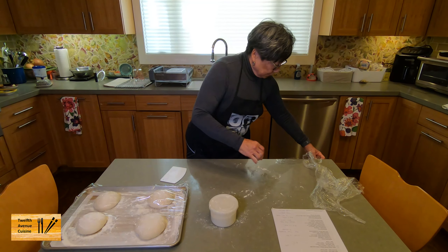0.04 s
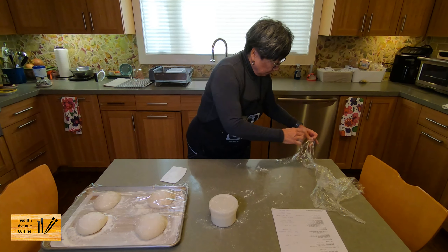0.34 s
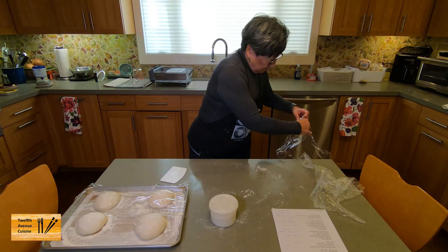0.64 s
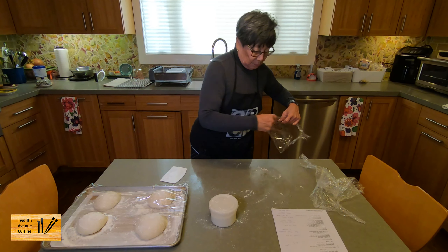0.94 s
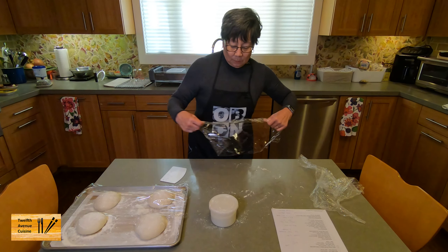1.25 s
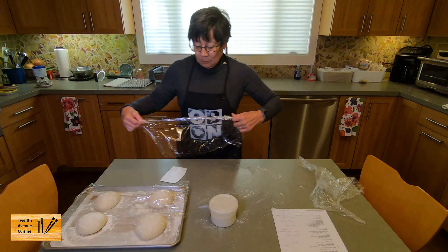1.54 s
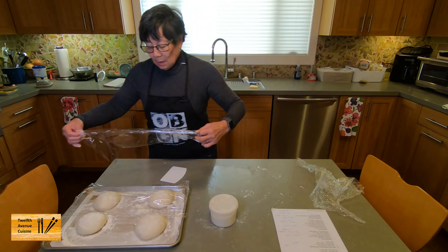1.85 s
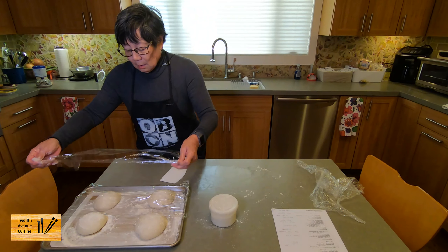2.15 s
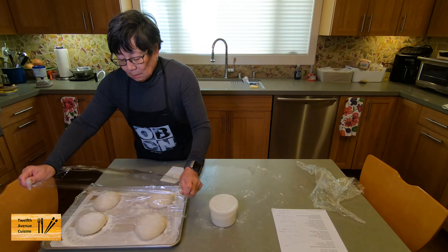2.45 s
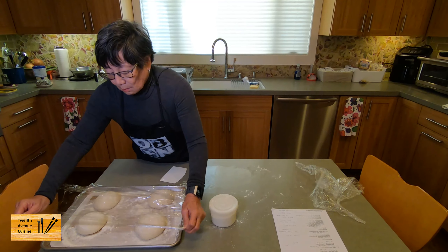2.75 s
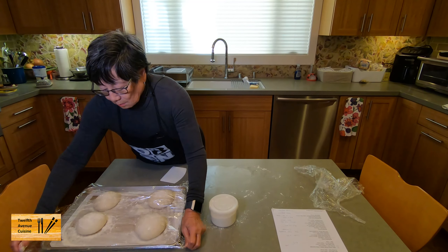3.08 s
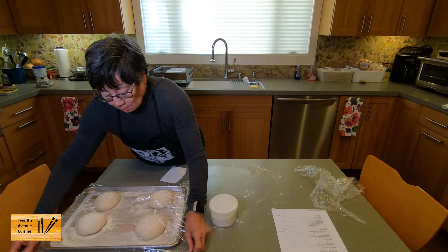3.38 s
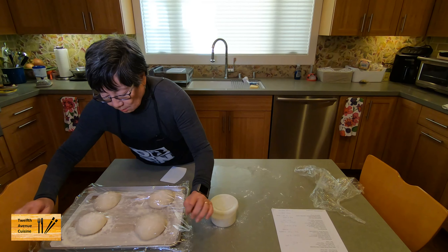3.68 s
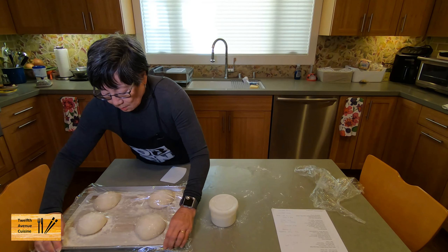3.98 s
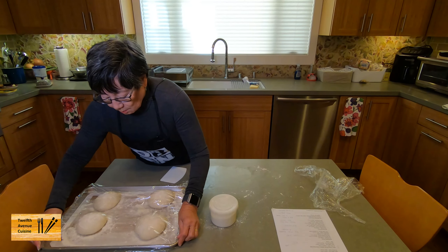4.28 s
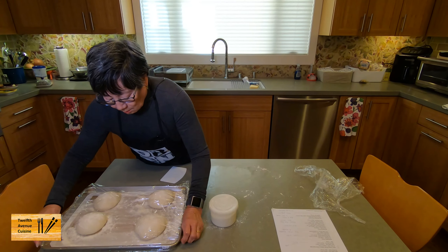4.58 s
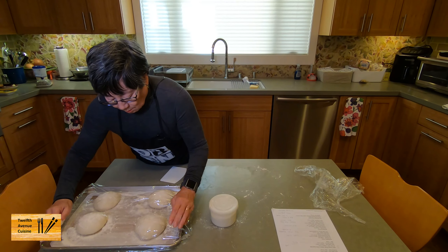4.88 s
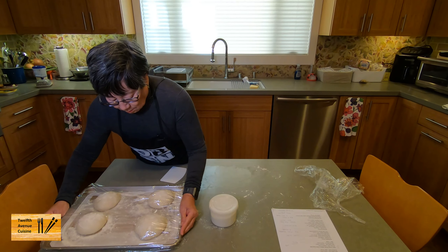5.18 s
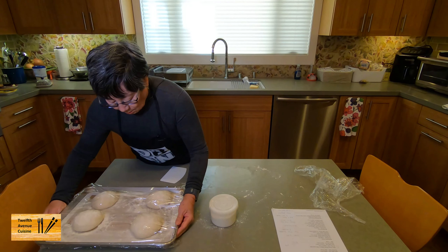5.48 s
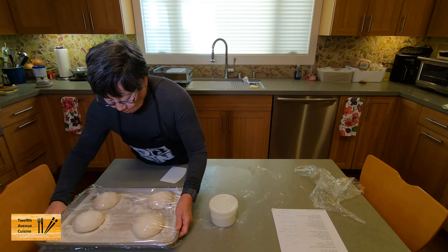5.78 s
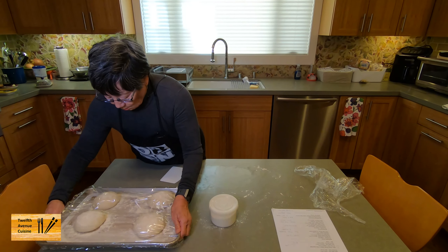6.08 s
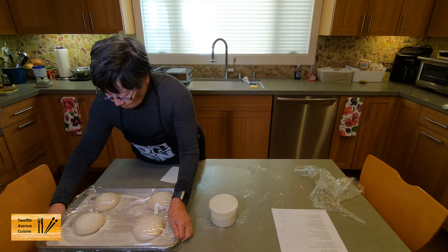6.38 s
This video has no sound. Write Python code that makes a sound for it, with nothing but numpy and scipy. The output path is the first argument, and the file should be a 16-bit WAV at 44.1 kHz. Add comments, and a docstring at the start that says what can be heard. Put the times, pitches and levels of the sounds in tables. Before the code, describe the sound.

Thin plastic wrap crinkles from the start, a fine, bright crackle that comes in uneven swells and is fullest around 1 second. From about 1.7 to 2.4 seconds the film is pulled taut and gives a faint, wavering rasp among the rustling. Sharp little snaps come mostly between 1.4 and 3.4 seconds, the strongest near 2.5, 2.7 and 3.3. After a short lull, lighter strokes of rustling return from 4 seconds to the end as the film is tucked around a metal tray. The tray knocks on the stone counter at about 5.7 seconds, twice more firmly around 6.2 to 6.3, then lightly near 6.6, each a clack with a short, damped ring. Underneath, a fridge hums low and steady, and the cook's movements add dull rubbing and soft thuds near 1.6, 5.4 and 6.6 seconds. The kitchen is slightly reverberant, heard in stereo from across the counter.

```python
"""Cling wrap on a baking tray

Film is peeled open, stretched and tucked round a metal tray in a tiled kitchen. It rustles with
countless tiny buckles and a few sharp snaps; at the end the tray knocks on the stone counter.
A fridge hums and the cook moves about. A camera with two close microphones stands across the counter."""
import sys
import numpy as np
from scipy import signal
from scipy.fft import rfft, irfft, next_fast_len
from scipy.io import wavfile

SR = 44100
rng = np.random.default_rng(int(sys.argv[2]) if len(sys.argv) > 2 else 0)


def digitize_waveform(pressure):
    """Quantize a signal to 16-bit integers and store it at the path in sys.argv[1].

    Rows of a 2-D input are taken as channels; values are limited to [-1, 1].
    """
    field = np.atleast_2d(pressure).T
    bounded = np.clip(field, -1, 1)
    quanta = np.round(bounded * 32767).astype(np.int16)
    wavfile.write(sys.argv[1], SR, quanta)


N = 292471
T = np.arange(N) / SR
CONTROL_T = T[::32]


def undb(db):
    """Decibels to gain."""
    return 10 ** (np.asarray(db) / 20)


def unit_rms(x):
    """Scale to rms 1."""
    return x / np.sqrt(np.mean(x ** 2))


def curves(table):
    """Interpolate (time, values...) rows to one curve per value column."""
    times_s, *columns = np.transpose(table)
    return [np.interp(T, times_s, column) for column in columns]


def at_hz(points, hz):
    """Read (frequency, value) points on a log-frequency axis."""
    points_hz, values = np.transpose(points)
    return np.interp(np.log(np.maximum(hz, 1)), np.log(points_hz), values)


def colour(x, eq, size=8192):
    """Minimum-phase filter through (frequency [Hz], gain [dB]) points."""
    gain = undb(at_hz(eq, np.fft.rfftfreq(size, 1 / SR)))
    cepstrum = irfft(np.log(gain))
    cepstrum[1:size // 2] *= 2
    cepstrum[size // 2 + 1:] = 0
    response = irfft(np.exp(rfft(cepstrum)))
    return np.apply_along_axis(signal.oaconvolve, -1, x, response)[..., :x.shape[-1]]


def decay(t, t60_s):
    """Exponential decay, 60 dB down at t60_s."""
    return np.exp(-np.log(1000) * t / t60_s)


def wander(rate_hz):
    """Random curve with a spread near 1."""
    knots_s = np.arange(0, T[-1] + 2 / rate_hz, 1 / rate_hz)
    return np.interp(T, knots_s, rng.standard_normal(len(knots_s)))


def add(track, time_s, sound):
    """Mix a sound into a track."""
    start = int(time_s * SR)
    track[start:start + len(sound)] += sound[:max(N - start, 0)]


# Stereo width: (frequency [Hz], side minus mid [dB])
WIDTH = [(60, -11.5), (250, -15.5), (500, -6), (1000, 1.5), (2000, -4), (4000, -3), (12000, 3)]

def diffuse_noise(size):
    """Noise from all directions: alike at both microphones in the bass, unrelated in the treble."""
    hz = np.fft.rfftfreq(size, 1 / SR)
    mid, side = rng.standard_normal((2, size))
    side = irfft(rfft(side) * undb(at_hz(WIDTH, hz)), size)
    return np.array([mid + side, mid - side])


# Kitchen decay: (frequency [Hz], t60 [s])
ROOM_T60 = [(150, 1.14), (500, 0.4), (1200, 0.5951), (3000, 0.42), (7000, 0.4843), (14000, 0.53)]

def kitchen_tail(build_s=0.0006):
    """Reverberation with unit mid energy; each octave dies at its own rate."""
    t = T[:SR * 2 // 3]
    spectrum = rfft(diffuse_noise(len(t)))
    hz = np.fft.rfftfreq(len(t), 1 / SR)
    octaves_hz = np.geomspace(125, 16000, 8)
    tail = 0
    for centre_hz, weights in zip(octaves_hz, np.eye(len(octaves_hz))):
        band = irfft(spectrum * at_hz(np.c_[octaves_hz, weights], hz), len(t))
        tail += band * decay(t, at_hz(ROOM_T60, centre_hz))
    tail *= 1 - np.exp(-t / build_s)
    return tail / np.sqrt(np.sum(tail.mean(axis=0) ** 2))


def in_room(x, tail, wet_db, pan_db=0):
    """Panned direct sound plus reverberation."""
    direct = x * undb([[pan_db / 2], [-pan_db / 2]])
    return direct + undb(wet_db) * signal.fftconvolve(x[None], tail)[:, :N]


# Mains and motor tones: (frequency [Hz], level [dB], unsteadiness [0-1])
HUM_TONES = [(59.7, -56.5, 0.33), (120.9, -53.5, 0.72), (165.8, -55.5, 0.8), (270.1, -58, 1),
             (287, -58.5, 0.54), (380.6, -65, 0.9), (461.3, -69, 0), (506.6, -68.5, 0), (2800, -81.5, 0.4),
             (3070, -86, 0.4)]
# Fan air: (frequency [Hz], gain [dB])
FAN_EQ = [(25, -37), (45, -24), (70, -13), (95, -3.5), (135, -3.5), (200, 1), (230, -2), (275, 2),
          (340, -3), (440, -9.5), (800, -13.5), (1050, -20.5), (2000, -28), (9000, -63)]

def fridge(flutter_hz=13, fan_db=-50.5, flicker_db=1.44):
    """Tones waver in strength and phase over softly flickering fan noise."""
    hum = 0
    for hz, db, unrest in HUM_TONES:
        flutter = wander(flutter_hz) + 1j * wander(flutter_hz)
        phasor = (1 + unrest * flutter) / np.hypot(1, unrest)
        hum += np.sqrt(2) * undb(db) * np.real(phasor * np.exp(2j * np.pi * hz * T))
    noise = diffuse_noise(next_fast_len(N, real=True))[:, :N]
    air = unit_rms(colour(noise, FAN_EQ))
    return hum + air * undb(fan_db + flicker_db * wander(8))


# Turns, steps and leans: (centre [s], half length [s], relative level [dB])
MOVES = [(.7, 0.68, -53.5), (1.723, 0.13, -59), (2.245, 0.48, -53), (4.192, 0.89, -57.5), (5.35, 0.53, -54),
         (6.55, 0.48, -54)]
# Rubbing: (frequency [Hz], gain [dB])
RUB_EQ = [(25, -18), (70, -10), (150, -0.5), (260, -2), (500, -3.5), (900, -13.5), (3000, -46.5)]

def shuffle(gain_db=-2, uneven_db=2):
    """The cook's clothes and feet rub dully, swelling and ebbing with each move."""
    power = 0
    for centre_s, half_s, db in MOVES:
        move = undb(db) * np.exp(-((CONTROL_T - centre_s) / half_s) ** 2)
        power += move ** 2
    envelope = np.interp(T, CONTROL_T, np.sqrt(power))
    rubbing = unit_rms(colour(rng.standard_normal(N), RUB_EQ))
    return rubbing * envelope * undb(gain_db + uneven_db * wander(25))


# Thuds: (time [s], level [dB], pitch [Hz], t60 [s])
BUMPS = [(1.599, -36, 168, 0.21), (1.619, -37, 208, 0.15), (3.287, -56, 170, 0.17),
         (5.4, -37.5, 180, 0.057), (6.619, -28.5, 200, 0.064)]

def bumps():
    """Soft, low thuds of the cook moving about."""
    out, t = np.zeros(N), T[:SR // 3]
    for time_s, db, hz, t60_s in BUMPS:
        band = signal.butter(2, [hz / 1.21, hz * 1.5], "bandpass", fs=SR, output="sos")
        burst = rng.standard_normal(len(t)) * decay(t, t60_s)
        makeup_gain = np.sqrt(SR / 2 / hz)
        add(out, time_s, undb(db) * makeup_gain * signal.sosfilt(band, burst))
    return out


# Early reflections: (delay [s], gain [linear])
ECHOES = [(.0047, 0.17), (.0069, 0.047), (0.0122, .3), (0.0204, 0.031)]

def echoed(x):
    """Add the first reflections from counter and cupboards."""
    out = x.copy()
    for delay_s, gain in ECHOES:
        add(out, delay_s, gain * x)
    return out


# Tray on counter: (time [s], strength [dB], contact corner [Hz])
KNOCKS = [(5.616, -22.5, 640), (5.7443, -8, 1400), (6.2316, -6.5, 1000), (6.301, -3, 2370),
          (6.534, -18, 1830), (6.622, -24, 1430)]

def tray_blows(low_cut_hz=85):
    """Contact pulses of the tray on the counter, each with its own strength and sharpness."""
    blows, t = np.zeros(N), T[:SR // 2]
    for time_s, db, corner_hz in KNOCKS:
        pulse = t * np.exp(-2 * np.pi * corner_hz * t)
        add(blows, time_s, undb(db) * pulse / pulse.sum())
    low_cut = signal.butter(2, low_cut_hz, "highpass", fs=SR, output="sos")
    return signal.sosfilt(low_cut, blows)  # the blows carry almost no deep bass


# Contact clack: (frequency [Hz], gain [dB])
CLACK_EQ = [(100, -9.5), (300, -3.5), (700, -0.5), (1000, 0), (1400, 1.5), (1900, 0), (2500, -5.5),
            (3300, -6), (4200, -14.5), (5600, -8), (8000, -26), (14000, -65)]

def tray_clack(blows, gain_db=14, contact_db=4, dense_db=-27, t60_s=0.043):
    """Metal meets stone: an impulse, then dense, heavily damped modes."""
    t = T[:SR // 2]
    response = undb(dense_db) * rng.standard_normal(len(t)) * decay(t, t60_s)
    response[0] = undb(contact_db)
    return undb(gain_db) * colour(signal.fftconvolve(blows, response)[:N], CLACK_EQ)


# Tray modes, damped by dough: (frequency [Hz], relative level [dB], t60 [s])
TRAY_MODES = [(128, -24.5, 0.27), (164, -29, 0.14), (245.4, -20, 0.18), (363.5, -15, 0.22), (431, -5, 0.12),
              (456.3, -3, 0.11), (567.4, -14.5, 0.28), (603.7, -13.5, 0.39), (888, -23.5, 0.5),
              (1012, -0.5, 0.075), (1060, -6, 0.06), (1092, -10, 0.31), (1124, -17, 0.3),
              (1230, -18, 0.086), (1336, -11, 0.037), (1673, -2, 0.042), (1950, -21, 0.02),
              (3000, -8.5, 0.057), (3110, -14, 0.046)]

def tray_ring(blows, gain_db=-11):
    """Every blow rings the same modes; a softer contact leaves out the high ones."""
    modes, t = 0, T[:SR // 2]
    for k, (hz, db, t60_s) in enumerate(TRAY_MODES):
        sign = (-1) ** k  # neighbours swing in opposition: close pairs swell, then cancel
        modes += sign * undb(db) * np.sin(2 * np.pi * hz * t) * decay(t, t60_s)
    return undb(gain_db) * signal.fftconvolve(blows, modes)[:N]


# Pull on the film: (time [s], pitch [Hz], relative level [dB])
STRETCH = [(1.72, 3000, -78), (1.78, 2850, -60), (1.85, 2400, -53), (1.93, 2120, -52), (2.0, 2134, -56.5),
           (2.08, 2115, -57), (2.22, 2076, -58), (2.36, 2050, -76)]

def stretch(gain_db=-6.5, waver_hz=180, rough_db=4.5):
    """Taut film slips through the fingers and sings with a faint, wandering rasp."""
    pitch_hz, level_db = curves(STRETCH)
    phase = 2 * np.pi * np.cumsum(pitch_hz + waver_hz * wander(1200)) / SR
    pulling = (T > STRETCH[0][0]) & (T < STRETCH[-1][0])
    return pulling * np.sin(phase) * undb(level_db + gain_db + rough_db * wander(120))


# Snaps and the rustle they stir: (time [s], relative snap level [dB], rustle [dB], slackness [dB])
SNAPS = [(1.358, -47, -53.5, -1), (1.574, -49, -52, 2), (1.768, -50, -46, 1.5), (2.031, -44, -48, -3),
         (2.448, -43, -53, 2), (2.461, -36.5, -48.5, -3), (2.6062, -40.5, -48, -4.5),
         (2.6498, -40, -54, -11), (2.654, -32, -50.5, -9), (2.7495, -47, -75, -3.5),
         (2.796, -49.5, -64, -2), (2.986, -54, -53.5, -4), (3.2508, -39, -56, 13.5),
         (3.261, -40.5, -58.5, 16), (3.285, -36, -64, 1), (3.419, -44, -52.5, 2.5),
         (4.451, -45.5, -57, 0.5), (4.656, -50, -49, 1.5), (5.464, -53, -57, 14), (6.029, -44.5, -59, -3),
         (6.0636, -38.5, -50.5, -3.5)]
# Snap spectrum: (frequency [Hz], gain [dB])
SNAP_EQ = [(300, -6), (1200, 9), (2300, 11), (3000, 16), (3900, 5.5), (5500, 7.5), (10000, 1),
           (12000, -4), (15500, -27)]

def snaps(gain_db=-4, click_db=14, t60_s=0.015):
    """Clinging layers let go: one sharp click, then a brief flurry of small ones."""
    out, t = np.zeros(N), T[:SR // 20]
    for time_s, db, _, _ in SNAPS:
        flurry = rng.standard_normal(len(t)) * decay(t, t60_s)
        flurry[0] = undb(click_db)
        add(out, time_s, undb(db + gain_db) * flurry)
    return colour(out, SNAP_EQ)


def swell(start_s, rise_s, hold_s, fall_db_per_s):
    """Control-rate gain: ease in, hold, die away."""
    age_s = CONTROL_T - start_s
    attack = np.sin(np.pi / 2 * np.clip(age_s / rise_s, 0, 1)) ** 2
    return attack * undb(-fall_db_per_s * np.maximum(age_s - rise_s - hold_s, 0))


# Hands gather, spread and tuck: (start [s], rise [s], hold [s], rustle [dB], slackness [dB])
STROKES = [(0.0, 0.0033, 0.24, -62, -3), (0.12, 0.21, 0.049, -50, -2.5), (0.4, 0.041, 0.2, -62.5, 0),
           (0.55, 0.08, 0.14, -54.5, -4), (0.649, 0.3, 0.14, -46.5, -2.5), (1.12, 0.063, 0.057, -49, -2),
           (1.32, 0.06, 0.099, -53, -2), (1.62, 0.037, 0.05, -54, -1.5), (1.81, 0.076, 0.047, -52, -0.5),
           (2.08, 0.051, 0.068, -52.5, -1), (2.25, 0.14, 0.057, -52.5, -1), (2.7, 0.094, 0.1, -59, -0.5),
           (2.98, .05, 0.18, -67.5, 0.5), (3.14, 0.13, .03, -53.5, 1.5), (3.53, 0.034, 0.016, -65, -3),
           (3.99, 0.12, .12, -53, 3), (4.25, 0.043, 0.11, -56.5, 0.5), (4.52, 0.056, 0.027, -58.5, 7.5),
           (4.602, 0.027, 0.017, -56, -1), (4.95, 0.088, 0.018, -58.5, 4.5), (5.08, 0.094, 0.026, -50.5, 1),
           (5.26, 0.088, 0.23, -56, 2), (5.68, 0.045, 0.065, -57, 0), (5.88, 0.08, 0.086, -59, 2),
           (6.1, 0.057, 0.087, -56.5, -0.5), (6.36, .09, 0.19, -58, 2)]

def handling(strain_s=0.033, lag_s=0.005, rest_db=-77, rest_slack_db=0.5):
    """Rustle level and power-weighted slackness in dB; slackness favours wide folds over fine ones."""
    stirs = []
    for start_s, rise_s, hold_s, db, slack_db in STROKES:
        stroke = swell(start_s, rise_s, hold_s, fall_db_per_s=135.5)
        stirs.append((undb(db) * stroke, slack_db))
    for time_s, _, db, slack_db in SNAPS:  # crackle builds under strain, peaks just after the snap
        crackle = swell(time_s + lag_s - strain_s, strain_s, hold_s=0, fall_db_per_s=221)
        stirs.append((undb(db) * crackle, slack_db))
    stirs.append((undb(rest_db), rest_slack_db))  # film left alone still ticks
    power = sum(gain ** 2 for gain, _ in stirs)
    mean_slack_db = sum(gain ** 2 * slack_db for gain, slack_db in stirs) / power
    return curves(np.c_[CONTROL_T, 10 * np.log10(power), mean_slack_db])


def buckles(rate_per_s, scatter_db=4.5, limit_db=24):
    """Folds buckle as random clicks, many small and a few large; rms 1."""
    fires = rng.random(N) < rate_per_s / SR
    size = undb(np.minimum(scatter_db * rng.standard_normal(N), limit_db))
    sign = rng.choice([-1, 1], N)
    return unit_rms(fires * size * sign / np.sqrt(rate_per_s))


def film_clicks(peak_rate_per_s=2600, fine_db=-2.5, wide_db=1.5, patchy_db=3.5):
    """Faster handling buckles more folds a second; slack film sounds duller than taut film."""
    level_db, slack_db = handling()
    rate_per_s = peak_rate_per_s * undb(0.5 * (level_db - level_db.max()))
    envelope = undb(level_db + patchy_db * wander(110))  # folds give way in small avalanches
    fine = envelope * buckles(rate_per_s) * undb(fine_db)
    wide = envelope * buckles(rate_per_s) * undb(wide_db + slack_db)
    return fine, wide


# Fine, bright folds: (frequency [Hz], gain [dB])
FINE_FOLD_EQ = [(400, -39), (1200, -12.5), (2500, -25), (3900, -0.5), (5400, 2), (7500, -0.5),
                (10200, -2.5), (11500, -12), (14300, -20), (15500, -35)]
# Wide, dull folds: (frequency [Hz], gain [dB])
WIDE_FOLD_EQ = [(300, -2.5), (700, -27), (1200, -3.5), (1600, -1), (2200, -0.5), (2900, 2.5), (3350, 1),
                (3900, -9), (7000, -27.5), (14000, -68)]

def film_rustle(tails, wet_db=5.5):
    """Buckles lie all over the sheet; each patch is heard mostly through its own reflections."""
    patch = rng.integers(len(tails), size=N)
    rustle = 0
    for clicks, eq in zip(film_clicks(), (FINE_FOLD_EQ, WIDE_FOLD_EQ)):
        spread = sum(in_room(clicks * (patch == k), tail, wet_db) for k, tail in enumerate(tails))
        rustle += colour(spread, eq)
    return rustle


def scene():
    """Film, tray and cook share one room, over the hum of the fridge."""
    tails = [kitchen_tail() for _ in range(4)]
    film = film_rustle(tails)
    film += in_room(snaps(), tails[0], wet_db=-0.5)
    film += in_room(stretch(), tails[1], wet_db=3)
    blows = tray_blows()
    tray = in_room(echoed(tray_clack(blows)), tails[2], wet_db=-3, pan_db=1)
    tray += in_room(echoed(tray_ring(blows)), tails[1], wet_db=-8.5)
    cook = in_room(bumps() + shuffle(), tails[3], wet_db=-9.5)
    return fridge() + cook + tray + film


def record(dry, cutoff_hz=15650):
    """The camera cuts the top treble steeply."""
    low_pass = signal.ellip(8, 0.2, 70, cutoff_hz, fs=SR, output="sos")
    return signal.sosfilt(low_pass, dry)


dry = scene()
out = record(dry)
digitize_waveform(out)
```